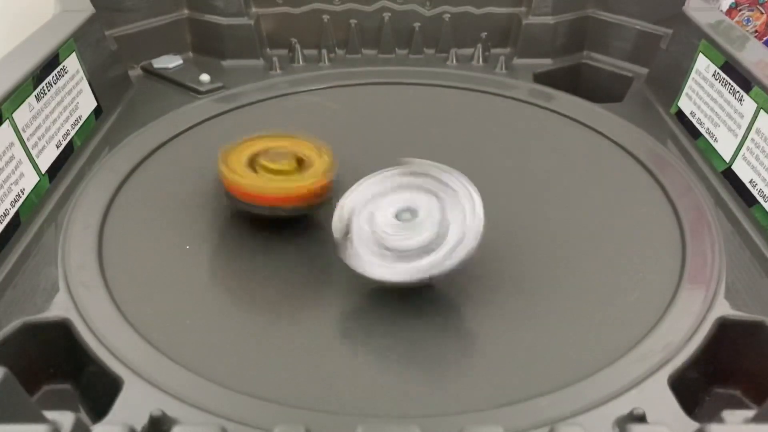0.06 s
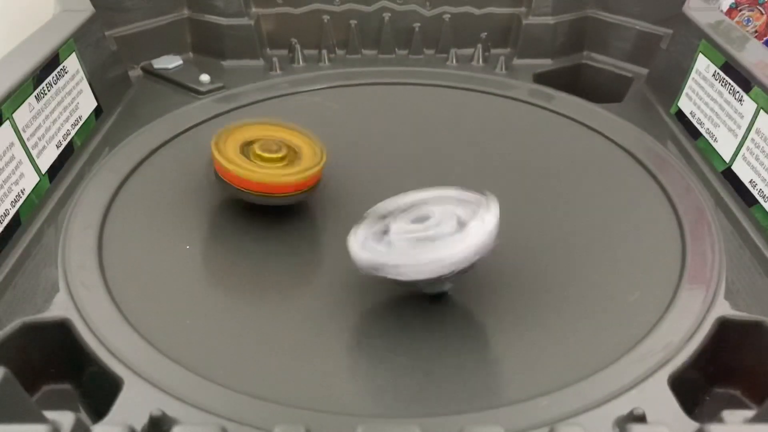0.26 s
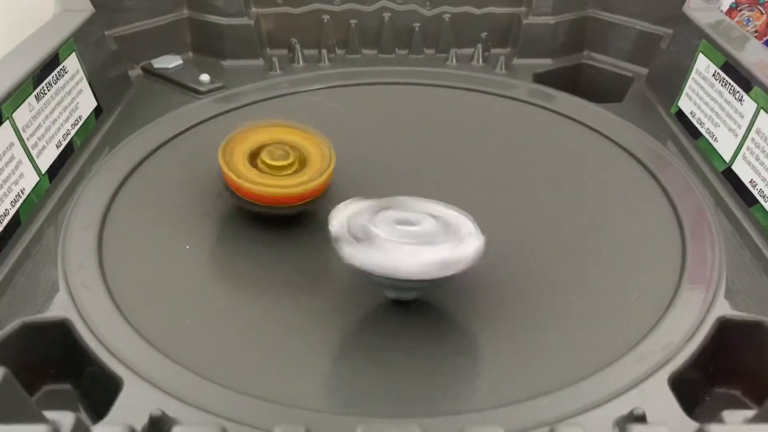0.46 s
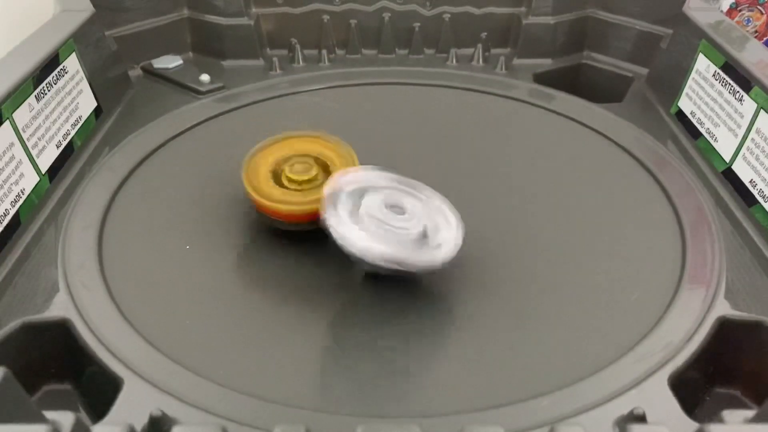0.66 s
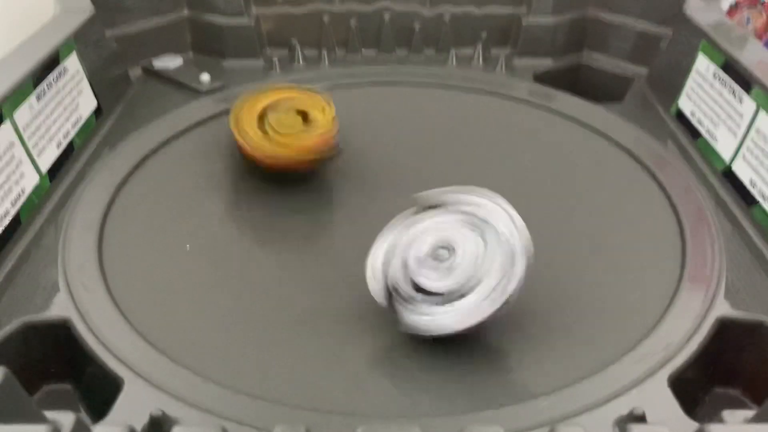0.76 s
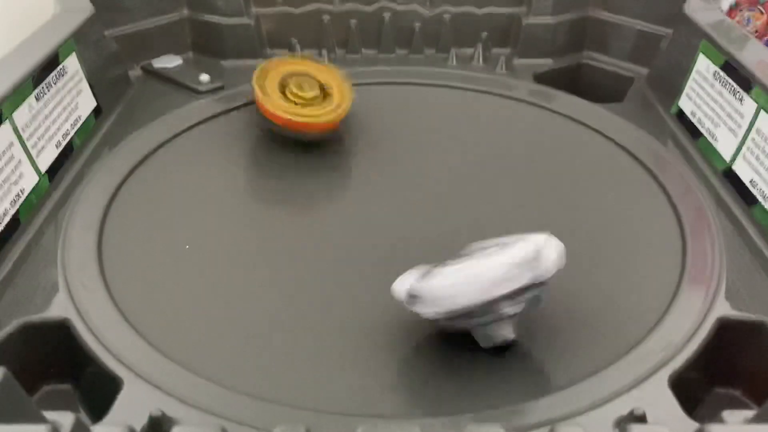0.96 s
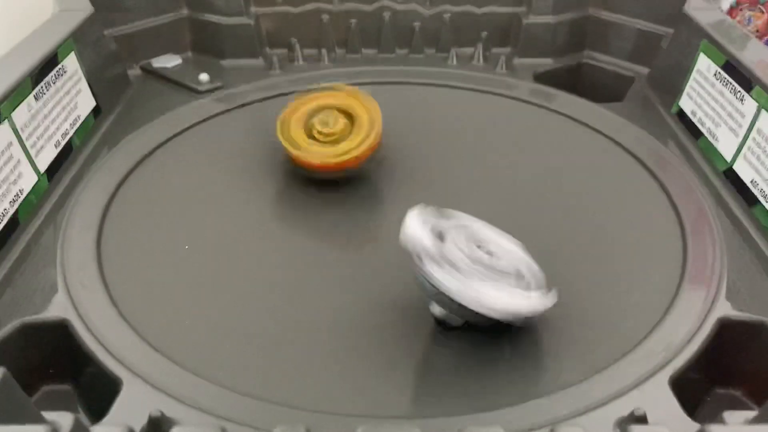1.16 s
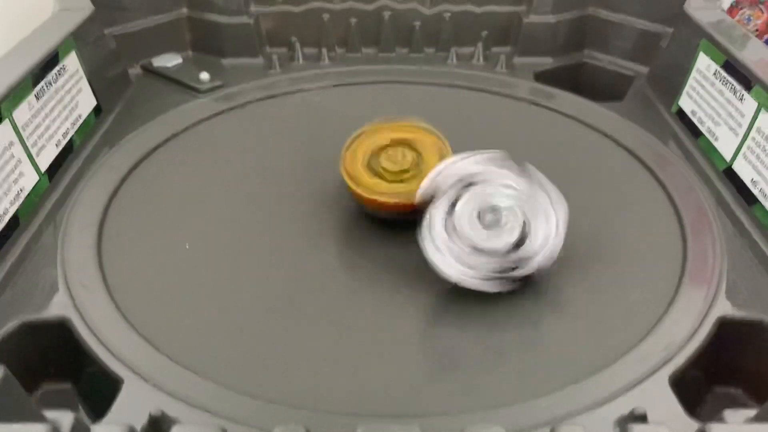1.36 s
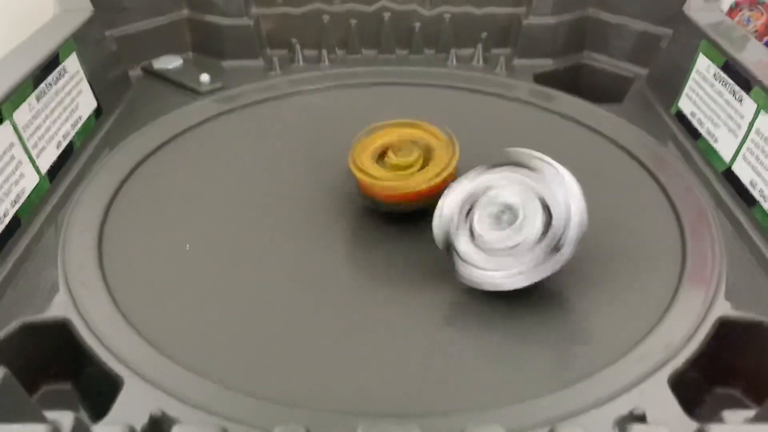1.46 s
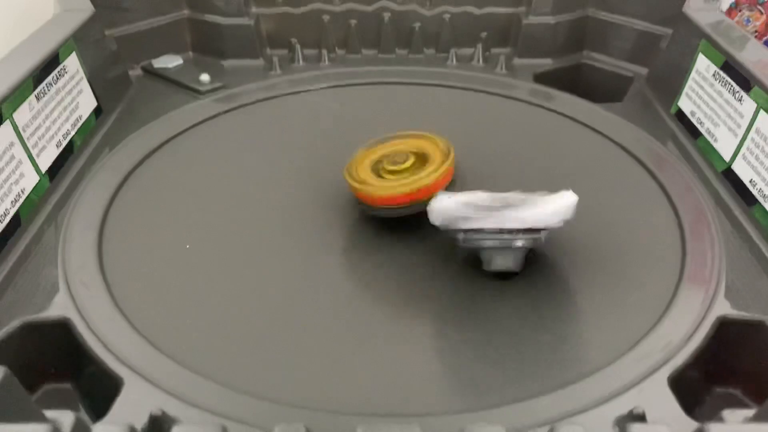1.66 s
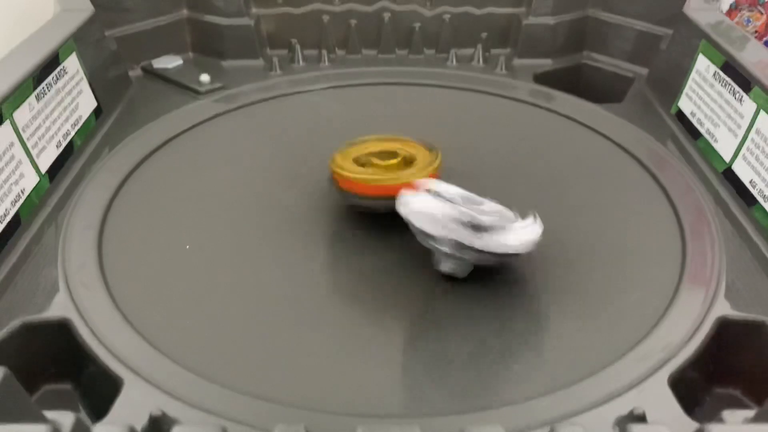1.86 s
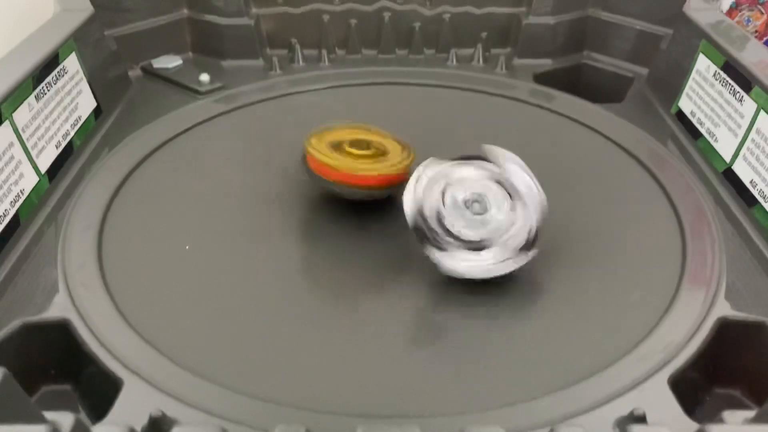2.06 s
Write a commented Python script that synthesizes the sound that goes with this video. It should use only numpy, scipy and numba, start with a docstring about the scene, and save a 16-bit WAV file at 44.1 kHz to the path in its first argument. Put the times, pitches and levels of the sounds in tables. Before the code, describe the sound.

Close to the microphones in a small room, two spinning tops clack together, tick lightly, then collide again. A wobbling top rattles more and more over the plastic arena, which booms softly like a shallow drum as the clashes continue.

```python
"""Two spinning tops wander in a hard plastic arena in a small room, close to a pair of microphones.
Their rims graze with light ticks and clash with sharp, chattering clacks; some blows ping their metal
weight rings. The wobbling top skitters and knocks on the floor of the arena, which rattles in the
midrange and booms like a shallow drum."""
import sys
import numpy as np
from scipy import signal
from scipy.fft import rfft, irfft, next_fast_len
from scipy.io import wavfile
from numba import njit

SR = 44100
rng = np.random.default_rng(int(sys.argv[2]) if len(sys.argv) > 2 else 0)


def digitize_waveform(pressure):
    """Quantize a signal to 16-bit integers and store it at the path in sys.argv[1].

    Rows of a 2-D input are taken as channels; values are limited to [-1, 1].
    """
    field = np.atleast_2d(pressure).T
    bounded = np.clip(field, -1, 1)
    quanta = np.round(bounded * 32767).astype(np.int16)
    wavfile.write(sys.argv[1], SR, quanta)


N = 93095
CONTACT_RISE_S, KNOCK_RISE_S = 0.00025, 0.0026


def rims(scrape):
    """Clashes, grazes and gritty scrape ring the rims of the tops; some blows also ping the metal."""
    # hard blows of rim on rim (time [s], level [dB])
    clash_hits = [(0.0156, -14.5), (0.0336, -5.5), (0.6799, -7), (0.6835, -5), (0.9606, -22.5),
                  (1.292, -12), (1.3259, -6.5), (1.3296, -4), (1.334, -12.5), (1.3566, -14.5), (1.677, -9),
                  (1.6798, -6.5), (1.8834, -8), (1.8871, -11), (1.9113, -22)]
    # light grazes of the rims (time [s], level [dB])
    graze_hits = [(.001, -13), (.006, -25), (0.14, -28.5), (0.158, -37), (.164, -33), (0.239, -34.5),
                  (0.285, -36), (0.528, -56), (0.617, -41), (0.713, -30), (0.794, -31), (0.825, -32),
                  (.865, -37.5), (.893, -25), (0.904, -23), (0.919, -22.5), (0.997, -45), (1.0144, -26),
                  (1.066, -26), (1.132, -24.5), (1.1827, -23), (1.214, -23.5), (1.416, -25), (1.473, -22),
                  (1.541, -25), (1.588, -35), (1.646, -28), (1.662, -21.5), (1.893, -12.5)]
    # bright tone of the rims (frequency [Hz], level [dB])
    rim_colour = [(300, -16), (1200, -8), (2500, -5.5), (5000, -4), (6500, -0.5), (8500, 4.5), (11500, 1.5),
                  (13000, 1), (14500, -2.5), (16000, -21.5)]
    # rim resonances (frequency [Hz], width [Hz], boost [dB])
    rim_modes = [(7730, 200, 2), (9600, 360, 4), (10500, 400, 4), (11200, 500, 5), (15380, 140, 12)]
    clash_s, clash_db = np.array(clash_hits).T
    graze_s, graze_db = np.array(graze_hits).T
    clacks = chatter(blows(clash_s, undb(clash_db)), t60=0.013, rise=CONTACT_RISE_S)
    clacks = room(clacks, wet_db=-7.5)
    ticks = chatter(blows(graze_s, undb(graze_db)), t60=0.02, rise=0.00035)
    ticks = room(ticks + scrape, wet_db=-5.5)
    return ring(clacks + ticks, rim_colour, rim_modes) + room(weight_rings(), wet_db=-9.5)


def weight_rings(spread_octaves=0.13):
    """The metal weight rings of the tops ping; each blow favours the modes near one pitch."""
    # blows on the metal (time [s], level [dB], favoured pitch [Hz])
    pings = [(0.0146, -24.5, 3190), (.237, -40, 4880), (0.418, -54, 4880), (0.529, -51, 3190),
             (0.6796, -15.5, 3360), (0.6833, -20.5, 2640), (.6855, -24, 4330), (0.9607, -26, 3050),
             (1.014, -33.5, 3500), (1.327, -23, 3550), (1.6791, -20, 3550), (1.8833, -18, 3650),
             (1.8837, -16.5, 6530)]
    # modes of the weight rings (frequency [Hz])
    metal_modes = [2520, 2790, 3190, 3500, 3690, 4080, 4900, 5880, 6790, 7230]
    t = np.arange(SR // 10) / SR
    hz = np.array(metal_modes, float)
    shape = strike_envelope(t, t60=0.019, rise=CONTACT_RISE_S)
    out = np.zeros((2, N + SR))
    for start, db, favoured_hz in pings:
        gains = undb(db) / (1 + (np.log2(hz / favoured_hz) / spread_octaves) ** 2)
        phases = rng.uniform(0, 2 * np.pi, (2, len(hz), 1))
        partials = np.sin(2 * np.pi * hz[:, None] * t + phases)
        first = int(start * SR)
        out[:, first:first + len(t)] += shape * (gains @ partials)
    return out[:, :N]


def skitter(hops_per_s=260, ring_hz=1181, ring_octaves=0.4164):
    """Irregular hops of the tips: gritty scrape, floor rattle, hollow ringing and a push for the boom."""
    # strength of the skitter between knocks (time [s], rattle [dB], boom [dB])
    skitter_levels = [(0, -80, -33.5), (0.102, -49, -61), (.18, -46.5, -52.5), (0.301, -46, -62),
                      (.38, -62.5, -63), (.46, -59, -58), (.66, -51.5, -55.5), (.74, -44, -41),
                      (.85, -47, -41), (0.907, -39, -34.5), (1.048, -49.5, -48.5), (1.156, -35, -35.5),
                      (1.271, -36.5, -38), (1.388, -34.5, -33), (1.446, -44, -54.5), (1.507, -37.5, -40.5),
                      (1.7, -40, -46.5), (1.775, -44.5, -44.5), (1.846, -56, -65.5), (1.917, -39, -44),
                      (2.012, -47, -44.5), (2.05, -58, -55), (2.11, -64, -47.5)]
    gap, force, pitch, roughness = rng.standard_normal((4, 1200))
    times = np.cumsum(np.exp(gap / 2)) / hops_per_s
    heard = times < N / SR
    times, gains = times[heard], undb(3 * force[heard])
    hops = chatter(blows(times, gains), t60=0.025, rise=0.00049)
    tones = floor_spots(times, gains, ring_hz * 2 ** (ring_octaves * np.clip(pitch[heard], -2, 2)))
    grit_gains = undb(9 * np.minimum(roughness[heard], 2))
    grit = chatter(blows(times, grit_gains), t60=0.005, rise=CONTACT_RISE_S)
    hops, grit, tones = hops / hops.std(), grit / grit.std(), tones / tones.std()
    when, *levels = np.array(skitter_levels).T
    rattle_db, boom_db = (np.interp(np.arange(N) / SR, when, db) for db in levels)
    scrape_db = -32 + 1.57 * (rattle_db + 32)  # the treble grows faster than the rattle
    hollow = tones * undb(rattle_db - 5.5)
    return grit * undb(scrape_db), hops * undb(rattle_db) / 2, hollow, hops * undb(boom_db)


def arena(rattle, hollow, hop_push, boom_delay_s=0.00366):
    """Knocks and skitter rattle the plastic floor; the whole dish booms a moment after each knock."""
    # knocks on the floor (time [s], rattle [dB], pitch of the struck spot [Hz], boom [dB])
    knocks = [(0.003, -27, 1280, -40.5), (0.017, -26.5, 1464, -39), (0.037, -26, 1453, -44),
              (0.157, -31.5, 1400, -46), (0.236, -28, 1280, -55), (0.252, -36, 2160, -46),
              (0.282, -49, 1650, -64), (0.314, -37, 1162, -53), (0.406, -42, 832, -56),
              (0.419, -38, 1500, -60), (0.47, -42.5, 1440, -72), (0.495, -54.5, 2070, -59),
              (0.618, -35.5, 1136, -52), (0.683, -36, 1060, -30), (0.71, -27.5, 1084, -40.5),
              (0.723, -45, 866, -32.5), (0.795, -27.5, 968, -38.5), (0.866, -33.5, 1080, -42),
              (0.887, -28.5, 878, -39), (0.958, -31, 2250, -66), (1.011, -27, 1746, -51.5),
              (1.063, -30.5, 732, -43.5), (1.117, -27.5, 925, -37), (1.212, -26.5, 1370, -29),
              (1.226, -22, 2145, -31.5), (1.29, -20, 1180, -28.5), (1.307, -17.5, 1660, -36),
              (1.349, -23, 1270, -30.5), (1.375, -29.5, 913, -28), (1.472, -27.5, 800, -38),
              (1.642, -25, 886, -48.5), (1.677, -28, 860, -36), (1.887, -24.5, 833, -37.5),
              (1.986, -34, 1120, -46), (2.066, -35.5, 1140, -60), (2.104, -35.5, 1240, -55)]
    # midrange tone of the floor (frequency [Hz], level [dB])
    floor_colour = [(150, -16), (420, -20.5), (600, -7), (850, 0.5), (1250, 4), (2200, -11), (3200, -7.5),
                    (6000, -15.5), (12000, -18.5)]
    # floor resonances (frequency [Hz], width [Hz], boost [dB])
    floor_modes = [(616, 23.6, 3), (825, 13, 6.5), (1600, 24, 1.4), (2153, 390, 12)]
    when, db, spot_hz, boom_db = np.array(knocks).T
    clatter = chatter(blows(when, undb(db)), t60=0.043, rise=KNOCK_RISE_S)
    floor = ring(clatter + rattle, floor_colour, floor_modes)
    struck = floor_spots(when, undb(db - 7.5), spot_hz)
    # each impulse carries the energy of 10 ms at its boom level
    knock_push = blows(when + boom_delay_s, undb(boom_db) * np.sqrt(0.01 * SR))
    boom = dish(knock_push + hop_push)
    return room(floor + struck + hollow, wet_db=-1.5) + undb(-1.5) * room(boom, wet_db=-8)


def floor_spots(times, gains, hz, overtone_ratio=1.58, overtone_db=-5.5):
    """Each struck spot of the floor rings briefly with its own hollow pitch and one overtone."""
    t = np.arange(SR // 16) / SR
    shape = strike_envelope(t, t60=0.077, rise=KNOCK_RISE_S)
    out = np.zeros(N + SR)
    for start, gain, pitch in zip(times, gains, hz):
        phase = 2 * np.pi * pitch * t
        tone = np.sin(phase) + undb(overtone_db) * np.sin(overtone_ratio * phase)
        first = int(start * SR)
        out[first:first + len(t)] += gain * shape * tone
    return out[:N]


def dish(push):
    """The dish booms like a shallow drum; its lowest resonance rises while a tip rides the stiff edge."""
    # bass tone of the dish (frequency [Hz], level [dB])
    drum_colour = [(25, -4), (55, -5), (80, -5), (115, -1), (200, -5), (290, -5), (350, -15), (450, -21),
                   (900, -26), (3000, -119.5)]
    # dish resonances (frequency [Hz], width [Hz], boost [dB])
    drum_modes = [(122, 62, 5.1), (167, 23, 3.4), (278.6, 38, 5.8)]
    # path of the lowest resonance (time [s], frequency [Hz])
    lowest_resonance = [(.7, 94), (.82, 115), (.92, 134), (.96, 193), (1.03, 214), (1.091, 280),
                        (1.151, 136), (1.23, 115), (1.41, 100.6), (1.5, 115.6)]
    corner_hz = np.interp(np.arange(N) / SR, *np.array(lowest_resonance, float).T)
    boom = ring(push, drum_colour, drum_modes)
    return np.array([high_pass(side, corner_hz, damping=0.8) for side in boom])


def blows(times, gains):
    """One impulse for each blow."""
    out = np.zeros(N)
    np.add.at(out, np.clip((times * SR).astype(int), 0, N - 1), gains)
    return out


def strike_envelope(t, t60, rise):
    """A quick attack and a decay of 60 dB in t60 seconds."""
    return (1 - np.exp(-t / rise)) * np.exp(-np.log(1000) * t / t60)


def chatter(impulses, t60, rise):
    """Each blow sets off a fast-dying noise burst of tiny contacts, in two independent channels."""
    shape = strike_envelope(np.arange(SR // 5) / SR, t60, rise)
    power = np.abs(signal.fftconvolve(impulses ** 2, shape ** 2)[:N])
    return np.sqrt(power) * rng.standard_normal((2, N))


def ring(x, colour, modes, size=8192):
    """Pass through a body with a broad colour and resonances, at unit mean power gain."""
    hz = np.arange(size // 2 + 1) * SR / size
    peaks = sum((undb(db) - 1) / (1 + (2 * (hz - centre) / width) ** 2) for centre, width, db in modes)
    gain = undb(curve_at(hz, colour)) * (1 + peaks)
    gain /= np.sqrt(np.mean(gain ** 2))
    # minimum phase: the body rings only after the blow
    cepstrum = irfft(np.log(gain))
    cepstrum[1:size // 2] *= 2
    cepstrum[size // 2 + 1:] = 0
    response = irfft(np.exp(rfft(cepstrum)))
    return signal.fftconvolve(x, response[None], axes=1)[:, :N]


@njit
def high_pass(x, hz, damping):
    """Resonant high-pass with a moving corner."""
    y, band_state, low_state = np.empty(len(x)), 0., 0.
    for i in range(len(x)):
        g = np.tan(np.pi * hz[i] / SR)
        band = (band_state + g * (x[i] - low_state)) / (1 + g * (g + damping))
        low = low_state + g * band
        band_state, low_state = 2 * band - band_state, 2 * low - low_state
        y[i] = x[i] - damping * band - low
    return y


def undb(db):
    """Decibels to gain."""
    return 10 ** (np.asarray(db) / 20)


def curve_at(hz, table, column=1):
    """Read a column of a table on a log-frequency axis."""
    table = np.array(table, float)
    return np.interp(np.log(hz + 1), np.log(table[:, 0]), table[:, column])


def room(x, wet_db, rise_s=0.00034):
    """Add the diffuse echo of the arena walls and the room, longest in the bass."""
    # decay of the echo (frequency [Hz], time to fall 60 dB [s])
    decays = [(100, 0.38), (300, 0.21), (900, 0.14), (2000, 0.13), (5000, 0.29), (10000, 0.12),
              (16000, 0.14)]
    size = SR // 2
    t, hz = np.arange(size) / SR, np.arange(size // 2 + 1) * SR / size
    noise = rfft(rng.standard_normal((2, size)))
    log_centres = np.log([centre for centre, _ in decays])
    tail = np.zeros((2, size))
    for share, (_, t60) in zip(np.eye(len(decays)), decays):
        band = irfft(noise * np.interp(np.log(hz + 1), log_centres, share), size)
        tail += band * strike_envelope(t, t60, rise_s)
    tail /= np.sqrt(np.sum(tail ** 2, axis=1, keepdims=True))
    return x + undb(wet_db) * signal.fftconvolve(x, tail, axes=1)[:, :N]


def microphones(x):
    """The two microphones hear each frequency with its own likeness, balance and phase."""
    # stereo image (frequency [Hz], likeness [0-1], left minus right [dB])
    image = [(47.7, 0, 22), (131, 0.54, 0.5), (272, 1, 1.5), (755, 0.22, 4), (1250, 0.54, 1.5),
             (1950, 0, 2.5), (3630, 0, 1.5), (4870, 0, -4.5), (7870, 0.92, 0), (16000, 0.84, 0)]
    # phase lead of the right side (frequency [Hz], lead [rad])
    right_lead = [(0, 0), (1200, -.4), (1600, -3), (5300, -3), (6400, 1), (7300, 1.3), (8500, 3.1),
                  (9200, 3.2), (10400, 6.2), (11400, 6.3), (13000, 9.3), (14200, 9.8), (15000, 12.4),
                  (16000, 12.6)]
    size = 2 * next_fast_len(N // 2 + SR // 20, True)
    left, other = rfft(x, size)
    hz = np.arange(size // 2 + 1) * SR / size
    likeness = curve_at(hz, image)
    balance = undb(curve_at(hz, image, column=2) / 2)
    right = likeness * left + np.sqrt(1 - likeness ** 2) * other
    right *= np.exp(1j * np.interp(hz, *np.array(right_lead).T))
    return irfft(np.array([left * balance, right / balance]))[:, :N]


def scene():
    """Tops and arena as they reach the two microphones."""
    scrape, rattle, hollow, hop_push = skitter()
    return microphones(rims(scrape) + arena(rattle, hollow, hop_push))


def record(dry):
    """Soft saturation rounds the loudest peaks, and a steep low-pass cuts the highest treble."""
    ceiling, cutoff_hz = 0.9, 16000
    low_pass = signal.ellip(8, .2, 70, cutoff_hz, fs=SR, output="sos")
    return signal.sosfilt(low_pass, ceiling * np.tanh(dry / ceiling))


dry = scene()
out = record(dry)
digitize_waveform(out)
```